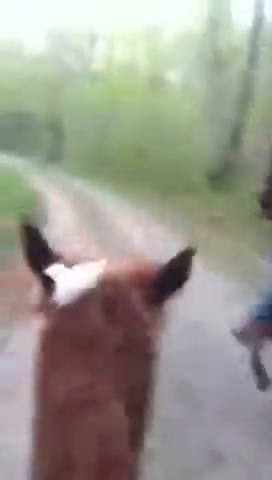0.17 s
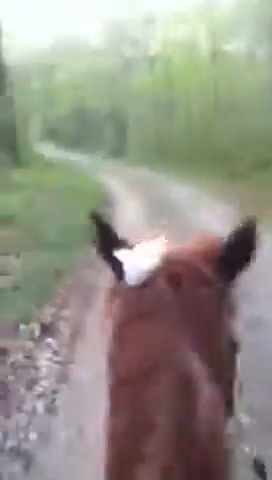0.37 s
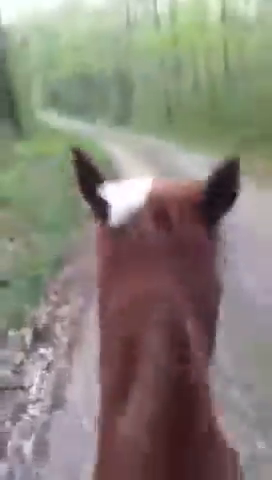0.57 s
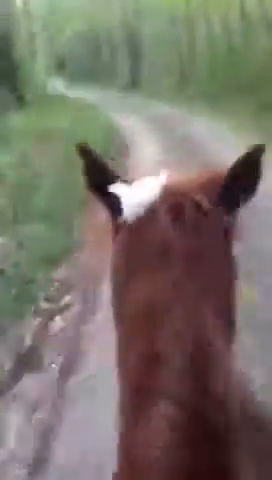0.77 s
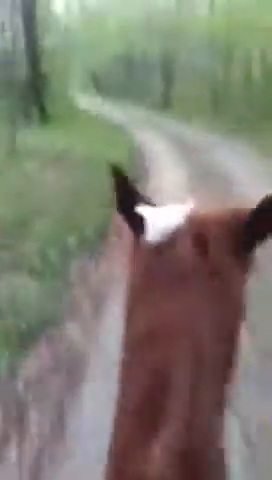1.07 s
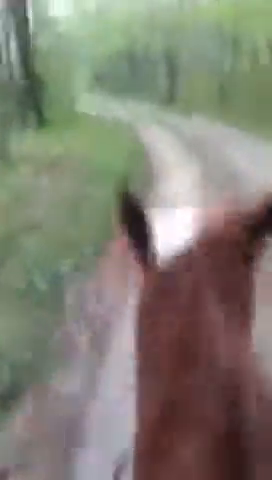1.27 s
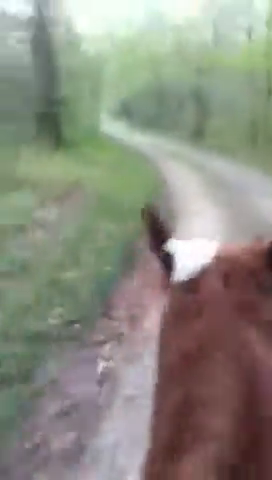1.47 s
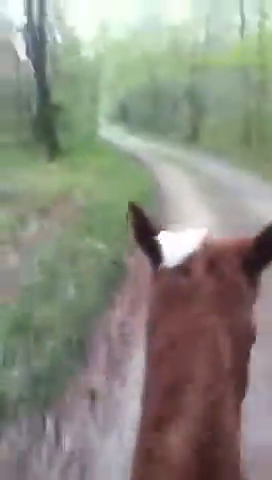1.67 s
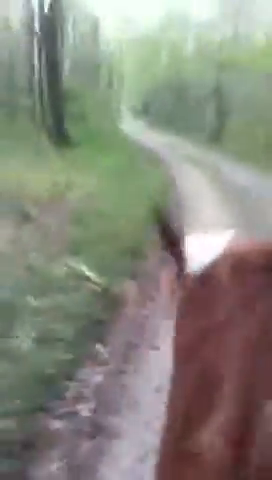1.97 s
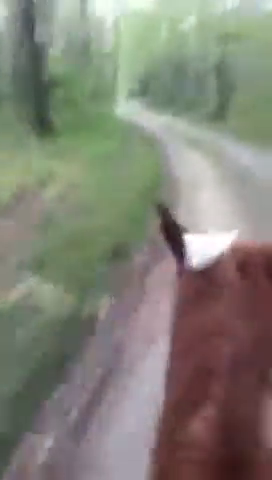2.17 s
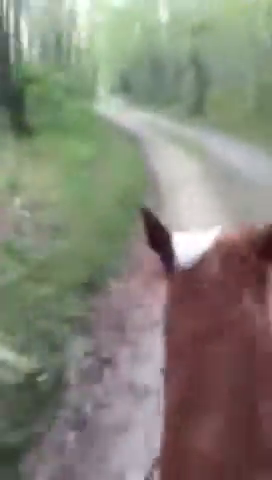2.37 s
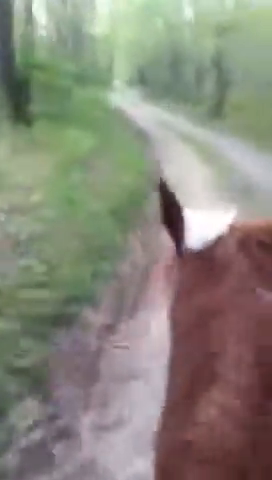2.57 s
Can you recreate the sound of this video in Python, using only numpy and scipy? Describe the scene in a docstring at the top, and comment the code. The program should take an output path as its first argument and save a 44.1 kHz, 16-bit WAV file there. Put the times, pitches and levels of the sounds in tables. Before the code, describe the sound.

Quick hoofbeats crunch along a gravel road, with lumps of wind rumble on the microphone.

```python
"""Horses on a gravel road

A horse gaits quickly along, heard from the saddle, with a second horse close by.
Each hoof gives a short hollow clop, crunches into the gravel and flicks stones against each other.
Loose gravel ticks between the steps and the metal fittings of the tack jingle faintly.
Wind buffets the microphone in lumps as the rider bounces."""
import sys
import numpy as np
from scipy import signal
from scipy.fft import rfft, irfft
from scipy.io import wavfile

SR = 44100
rng = np.random.default_rng(int(sys.argv[2]) if len(sys.argv) > 2 else 0)


def output_pcm(signal):
    """Save a mono or channel-first signal as 16-bit PCM at the path in sys.argv[1].

    Samples are clipped to [-1, 1] before scaling.
    """
    pcm = np.clip(np.atleast_2d(signal).T, -1, 1) * 32767
    wavfile.write(sys.argv[1], SR, np.round(pcm).astype(np.int16))


N = 119952
START_S, BAND_LIMIT_HZ = 0.119, 16200


def amp(db):
    """Decibels to gain."""
    return 10 ** (np.asarray(db) / 20)


def unit_rms(x):
    """Scales to rms 1."""
    return x / np.sqrt(np.mean(x ** 2) + 1e-20)


def add(mix, start_s, sound):
    """Mixes a sound in at a time."""
    part = mix[max(round(start_s * SR), 0):][:len(sound)]
    part += sound[:len(part)]


def coloured(x, spectrum, uneven_db=0., size=8192, bump_count=40):
    """Minimum-phase filter with the given spectrum, plus optional random peaks and dips."""
    hz, db = np.transpose(spectrum)
    log_hz = np.log(np.fft.rfftfreq(size, 1 / SR) + 1)
    bump_log_hz = np.linspace(log_hz[size // 64], log_hz[-1], bump_count)
    bumps = np.interp(log_hz, bump_log_hz, rng.standard_normal(bump_count))
    gain_db = np.interp(log_hz, np.log(hz + 1), db) + uneven_db * bumps
    cepstrum = irfft(np.log(amp(gain_db)))
    cepstrum[1:size // 2] *= 2
    cepstrum[size // 2 + 1:] = 0
    impulse = irfft(np.exp(rfft(cepstrum)))[:size // 2]
    return signal.fftconvolve(x, impulse)[:len(x)]


def grains(n, per_s, spread_db):
    """Random clicks, most small and a few large."""
    sizes = amp(spread_db * np.minimum(rng.exponential(1, n), 4))
    return sizes * rng.choice([-1., 1.], n) * (rng.random(n) < per_s / SR)


def envelope(length_s, rise_s, fall_s, size=8192):
    """Linear rise, hold, exponential release."""
    t = np.arange(size) / SR
    return np.minimum(t / rise_s, 1) * np.exp(-np.maximum(t - length_s, 0) / fall_s)


def levelled(x, env, level_db):
    """Gives a burst the energy of its envelope held at a level."""
    return amp(level_db) * x * np.sqrt(np.sum(env ** 2) / (np.sum(x ** 2) + 1e-20))


# Fine gravel: freq_hz, gain_db
GRIT_SPECTRUM = [(30, -11), (130, 7.5), (600, -2), (1050, 0.5), (1600, -6.5), (5000, -13), (10500, -18.5),
                 (16000, -29)]


def grit(level_db=-40.5, swell_db=4):
    """Loose gravel ticks throughout, its level fluttering."""
    t = np.arange(N) / SR
    swell = unit_rms(sum(np.sin(2 * np.pi * (hz * t + rng.random())) for hz in np.geomspace(12, 110, 24)))
    ticks = grains(N, per_s=7000, spread_db=3) * amp(swell_db * swell)
    return amp(level_db) * unit_rms(coloured(ticks, GRIT_SPECTRUM))


# Tack fittings: start_s, peak_db, pitch_hz
JINGLES = [(.558, -39, 11700), (1.566, -50, 13620), (1.592, -44, 10950)]


def tack(t60_s=0.16, rattle_db=-66, rattle_hz=10860):
    """Metal fittings shake briefly and ring on a thin, high note; one rattles faintly all the way."""
    out, t = np.zeros(N), np.arange(SR // 2) / SR
    decay = np.exp(-np.log(1000) * t / t60_s)
    shake_env = envelope(length_s=0.02, rise_s=0.01, fall_s=0.01)
    for start_s, peak_db, pitch_hz in JINGLES:
        shake = shake_env * rng.standard_normal(len(shake_env))
        ring = signal.fftconvolve(shake, decay * np.sin(2 * np.pi * pitch_hz * t))
        add(out, start_s, amp(peak_db) * ring / abs(ring).max())
    taps = grains(N, per_s=15, spread_db=3)
    rattle = signal.oaconvolve(taps, decay * np.sin(2 * np.pi * rattle_hz * t))[:N]
    return out + amp(rattle_db) * unit_rms(rattle)


# Wind in the microphone port: freq_hz, gain_db
RUMBLE_SPECTRUM = [(20, -29.5), (70, -2.5), (115, 0.5), (200, -6.5), (300, -12), (500, -27.5),
                   (3000, -88.5)]
FLUTTER_SPECTRUM = [(50, -32.5), (300, -5.5), (450, -8.5), (650, -22.5), (3000, -76.5)]
# Wind lumps: time_s, length_s, rumble_db, flutter_over_rumble_db
GUSTS = [(0.123,0.048,-18.5,-12), (.227,0.0047,-34,10.5), (.31,0.048,-20,-7), (0.371,0.029,-20.5,-3),
         (.479,0.03,-14.5,-10.5), (.516,0.036,-20.5,-22), (.566,0.014,-19.5,-7.5),
         (0.614,0.055,-18.5,-14.5), (0.696,0.042,-23,-9.5), (0.751,0.053,-18,-18), (0.887,0.031,-25.5,-2.5),
         (0.93,0.071,-24.5,-4), (1.004,0.036,-23,-5.5), (1.153,0.027,-21.5,-1), (1.239,0.014,-18.5,-3.5),
         (1.281,0.062,-20.5,-12), (1.382,.05,-25.5,-6), (1.575,0.069,-21.5,-9.5), (1.753,0.073,-30.5,-9),
         (1.826,0.022,-16,-6), (1.874,0.04,-13.5,-16), (1.948,0.0063,-20,0.5), (1.988,0.021,-26,-7.5),
         (2.101,0.011,-20,-9.5), (2.159,0.0097,-19.5,-28), (2.198,0.017,-21.5,-22), (2.255,0.0097,-17.5,-7),
         (2.43,0.077,-22,-9.5), (2.698,0.017,-14.5,-4.5)]


def wind_gusts(rise_s=0.00712, fall_s=0.0064):
    """Wind hits the microphone in lumps of low rumble and higher flutter."""
    out = np.zeros(N)
    for time_s, length_s, rumble_db, flutter_over_rumble_db in GUSTS:
        env = envelope(length_s, rise_s, fall_s)
        rumble = coloured(env * rng.standard_normal(len(env)), RUMBLE_SPECTRUM)
        flutter = coloured(env * rng.standard_normal(len(env)), FLUTTER_SPECTRUM)
        add(out, time_s - rise_s, levelled(rumble, env, rumble_db))
        add(out, time_s - rise_s / 2, levelled(flutter, env, rumble_db + flutter_over_rumble_db))
    return out


# Eddies on the microphone: centre_s, peak_db, pitch_hz
EDDY_POPS = [(0.13,-5.5,175), (.3163,-8.5,694), (0.502,-9,284), (0.658,-9.5,315), (0.901,-6,430),
             (.94,-6,320), (0.968,-2.5,338), (1.309,-6,327), (1.317,-3.5,197), (1.419,-8.5,230),
             (1.662,-8.5,330), (1.838,-4,370), (2.119,-16.5,705), (2.2237,-2,396), (2.61,-17,420)]


def eddy_pops(highpass_ratio=0.58, size=2048):
    """A single eddy pops: a pressure spike and its slower rebound."""
    out, t = np.zeros(N), (np.arange(size) - size // 2) / SR
    for centre_s, peak_db, pitch_hz in EDDY_POPS:
        spike = 1 / np.cosh(2 * np.pi * pitch_hz * t)
        pop = signal.lfilter(*signal.butter(2, pitch_hz * highpass_ratio, "high", fs=SR), spike)
        add(out, centre_s + t[0], amp(peak_db) * pop / abs(pop).max())
    return out


# Stone on stone: freq_hz, gain_db
STONE_SPECTRUM = [(100, -2.5), (1200, 7), (4500, -9), (10000, -6), (16000, -4.5)]
# Stones under the shoes: start_s, length_s, peak_db, pitch_hz
STONE_SNAPS = [(.2295,0.0016,-20.5,4600), (.2565,0.00064,-12.5,6100), (.4395,0.00064,-10.5,2310),
               (0.602,0.0068,-15,2800), (0.61,0.0038,-14,5770), (0.7312,0.0016,-15,5830),
               (0.877,0.006,-18.5,7500), (0.8932,0.0022,-11,3480), (0.967,.001,-21.5,8200),
               (1.167,0.0072,-15,5800), (1.409,.002,-19.5,8660), (1.417,0.0009,-10.5,1780),
               (1.4822,0.0053,-12,3400), (1.551,.001,-16,5800), (1.696,0.0035,-14.5,2370),
               (1.9438,0.00039,-15,3320), (2.078,.0007,-23,4300), (2.205,0.0048,-13,4270),
               (2.219,0.0017,-11.5,3950), (2.247,0.0012,-12,2870), (2.327,0.0011,-16.5,8200),
               (2.453,0.0016,-16.5,4570), (2.543,0.0029,-14.5,4100), (2.606,0.0022,-14,2480)]


def stone_snaps(ring_db=8.5, ring_q=3.6, lowpass_ratio=1.72, size=1024):
    """Stones crack and scrape together, each ringing briefly and dulling above its pitch."""
    out = np.zeros(N)
    for start_s, length_s, peak_db, pitch_hz in STONE_SNAPS:
        env = envelope(length_s, rise_s=1 / SR, fall_s=0.0012, size=size)
        crack = coloured(env * rng.standard_normal(size), STONE_SPECTRUM, uneven_db=3.5)
        ring = amp(ring_db) * signal.lfilter(*signal.iirpeak(pitch_hz, ring_q, SR), crack)
        cutoff_hz = min(pitch_hz * lowpass_ratio, BAND_LIMIT_HZ)
        snap = signal.lfilter(*signal.butter(2, cutoff_hz, fs=SR), crack + ring)
        add(out, start_s, amp(peak_db) * snap / abs(snap).max())
    return out


# Crushed gravel: freq_hz, gain_db
GRAVEL_SPECTRUM = [(100, -28), (1600, 0), (2400, 3.5), (3200, -5), (4600, -5), (6500, -12.5), (10000, -13),
                   (16000, -33.5)]
# Hollow of the hoof: freq_hz, gain_db
HOLLOW_SPECTRUM = [(100, -6.5), (500, -10), (950, -3), (1150, -2), (1350, -7.5), (1700, -10), (4000, -44)]
# Hooves grinding into gravel: start_s, length_s, crunch_db, hollow_db
HOOF_SCUFFS = [(0.156,0.021,-37.5,-35.5), (0.218,0.024,-36,-30), (0.337,0.012,-26,-24),
               (0.423,0.018,-33.5,-26), (0.463,0.028,-27,-23), (.601,0.014,-28,-23), (0.624,0.028,-40,-29),
               (0.745,0.02,-29.5,-31), (0.773,0.027,-34.5,-26.5), (0.819,0.043,-39,-33),
               (0.876,0.027,-33.5,-34), (0.913,0.022,-37,-32), (1.02,0.026,-32.5,-31.5),
               (1.127,0.026,-35.5,-33.5), (1.152,0.027,-26.5,-25.5), (1.187,0.022,-35.5,-26.5),
               (1.272,0.0064,-29.5,-27.5), (1.336,0.01,-34.5,-26.5), (1.414,0.034,-32.5,-27.5),
               (1.482,0.02,-31,-32), (1.542,0.044,-38.5,-32), (1.593,0.008,-32,-25.5),
               (1.615,0.023,-33,-27), (1.691,0.019,-27,-27), (1.722,0.041,-36,-25.5),
               (1.802,0.0073,-29,-24.5), (1.879,0.015,-25,-22), (1.952,0.021,-29,-30),
               (2.001,0.022,-35.5,-29.5), (2.079,0.0041,-28.5,-24), (2.141,0.025,-31.5,-25),
               (2.193,0.025,-26.5,-25.5), (2.244,0.05,-38,-27.5), (2.327,0.011,-26,-24),
               (2.424,0.044,-29,-27.5), (2.535,0.029,-31.5,-27.5), (2.694,0.044,-29,-24)]


def hoof_scuffs(clump_db=2, clump_s=0.0033, stone_count=5):
    """A hoof crushes clumps of grains; the same grinding rings its hollow."""
    out = np.zeros(N)
    for start_s, length_s, crunch_db, hollow_db in HOOF_SCUFFS:
        env = envelope(length_s, rise_s=0.0034, fall_s=0.0051)
        n = len(env)
        clumps = np.interp(np.arange(n) / SR / clump_s, np.arange(n), rng.standard_normal(n))
        clicks = env * amp(clump_db * clumps) * grains(n, per_s=5000, spread_db=5)
        # Each click falls on one of several differently coloured stones.
        stone = rng.integers(0, stone_count, n)
        crunch = sum(coloured(clicks * (stone == k), GRAVEL_SPECTRUM, uneven_db=4)
                     for k in range(stone_count))
        hollow = coloured(clicks, HOLLOW_SPECTRUM, uneven_db=-1)
        add(out, start_s, levelled(crunch, env, crunch_db))
        add(out, start_s, levelled(hollow, env, hollow_db))
    return out


# Hoof wall modes: pitch_ratio, gain_db
HOOF_MODES = [(1, -6.5), (.82, -16.5), (1.17, -18.5), (2.05, -33)]
# Hooves knocking on the road and larger stones: start_s, peak_db, pitch_hz
HOOF_CLOPS = [(0.438,-21,1190), (0.49,-18,1190), (.764,-18,816), (0.78,-11.5,1073), (0.8929,-8,900),
              (1.171,-14,1050), (1.483,-17.5,1187), (1.572,-21,1850), (1.888,-3,1142), (2.15,-11,1093),
              (2.336,-17,1078), (2.46,-10.5,1030), (2.607,-17.5,1010), (2.698,-13.5,1050)]


def hoof_clops(rise_s=0.00076, t60_s=0.028, sag_fraction=0.081, sag_s=0.003):
    """The hoof wall rings briefly as it lands, its pitch sagging under the weight."""
    out, t = np.zeros(N), np.arange(4096) / SR
    env = (1 - np.exp(-(t / rise_s) ** 2)) * np.exp(-np.log(1000) * t / t60_s)
    sag = 1 + sag_fraction * np.exp(-t / sag_s)
    for start_s, peak_db, pitch_hz in HOOF_CLOPS:
        cycles = np.cumsum(pitch_hz * sag) / SR
        ring = env * sum(amp(gain_db) * np.sin(2 * np.pi * (pitch_ratio * cycles + rng.random()))
                         for pitch_ratio, gain_db in HOOF_MODES)
        add(out, start_s, amp(peak_db) * ring / abs(ring).max())
    return out


def scene():
    """Gravel, tack, wind and hooves in mono."""
    background = grit() + tack() + wind_gusts() + eddy_pops()
    return (background + stone_snaps() + hoof_scuffs() + hoof_clops())[None]


def record(dry):
    """Soft overload, a short opening silence, then the band limit."""
    clipped = np.tanh(dry) * (np.arange(N) / SR >= START_S)
    lowpass = signal.firwin(511, BAND_LIMIT_HZ, window=("kaiser", 9), fs=SR)
    return signal.oaconvolve(clipped, lowpass[None], "same")


dry = scene()
out = record(dry)
output_pcm(out)
```